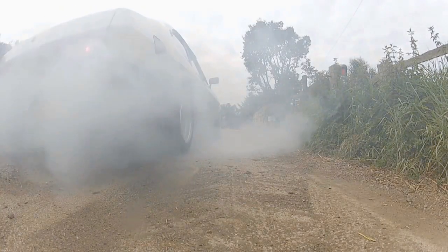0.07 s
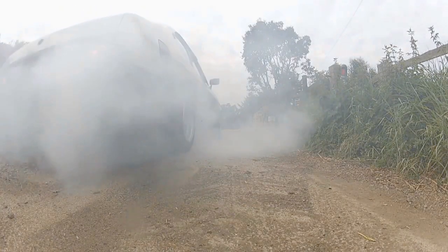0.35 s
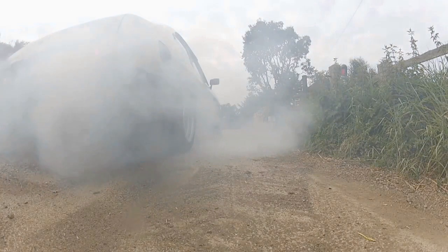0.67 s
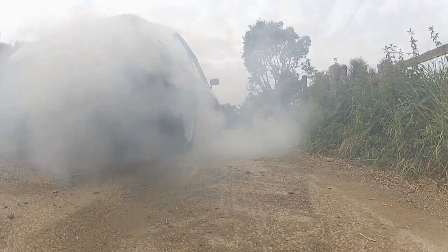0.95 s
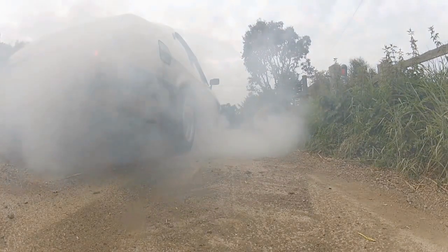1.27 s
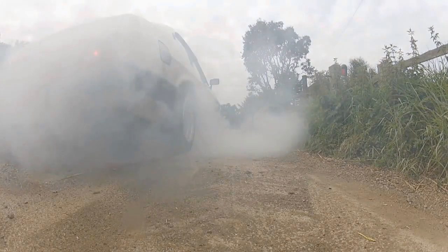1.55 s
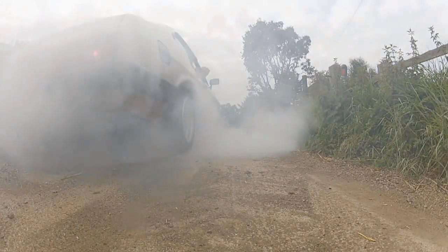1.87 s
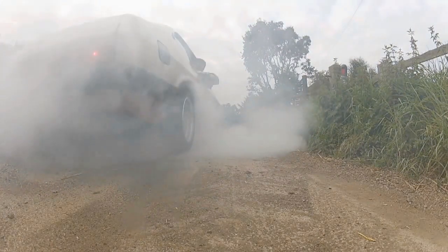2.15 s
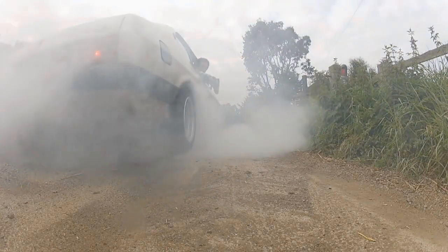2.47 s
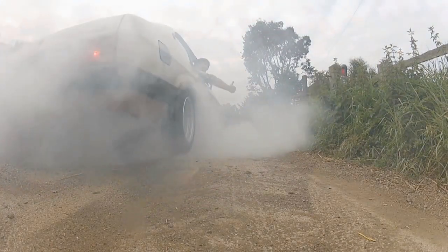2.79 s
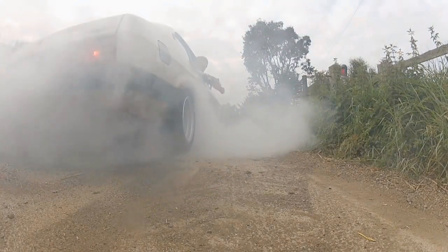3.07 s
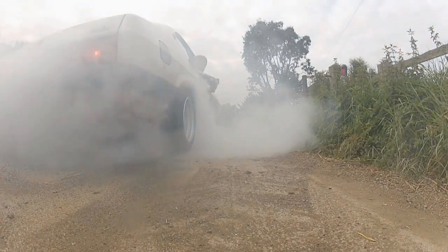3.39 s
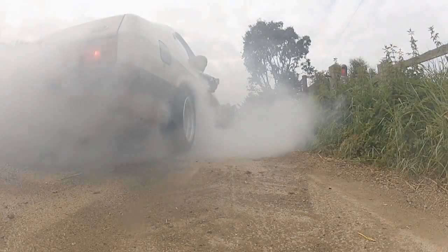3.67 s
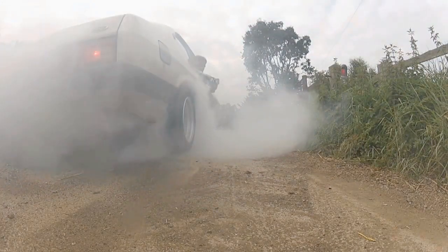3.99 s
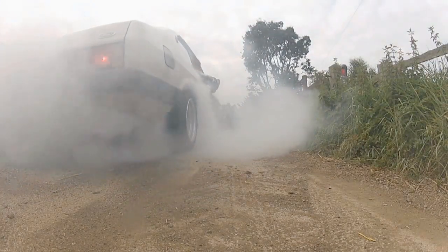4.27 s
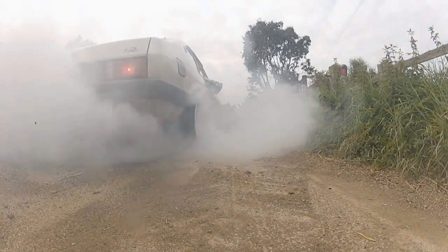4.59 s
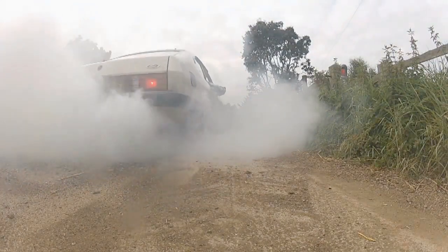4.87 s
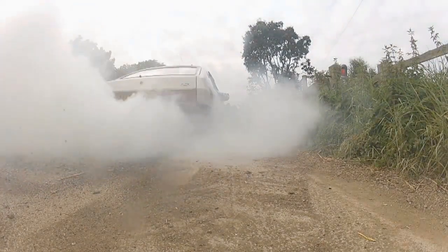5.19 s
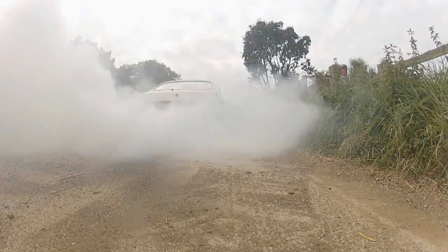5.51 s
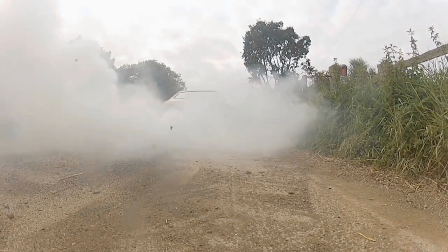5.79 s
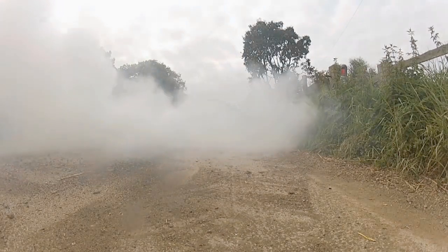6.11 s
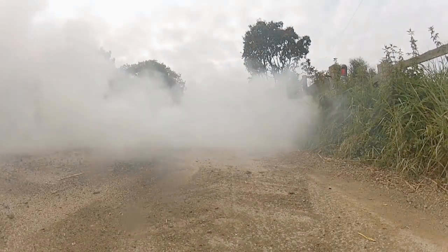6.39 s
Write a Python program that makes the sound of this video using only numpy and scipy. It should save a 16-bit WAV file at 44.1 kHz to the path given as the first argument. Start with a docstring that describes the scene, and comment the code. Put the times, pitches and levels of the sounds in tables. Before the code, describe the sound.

From just behind the tailpipe, a car engine drones and burbles at high revs while its tyres scrub on a dirt lane. Grit ticks now and then, and the exhaust briefly spits three times. A faint tyre chirp comes about halfway; later the car drives off, revs climbing amid quick, rough chirps. A faint wind rumble lies underneath, and the small microphone adds slight distortion.

```python
"""A four-cylinder car does a burnout on a dirt lane, heard from close behind its exhaust.
From the start, periodic firings drone over turbulent gas puffs, tyre scrub and low buffeting. Grit ticks,
and the engine stumbles and spits near 0.5, 1.8 and 4.5 s. Stick-slip chirps begin at 3.5 s and crowd
together after 5 s, as the car pulls away with rising revs. Throughout, a small camera overloads on the
pulses and adds a thin fizz by holding each of its samples."""
import sys
import numpy as np
from scipy import signal
from scipy.fft import rfft, irfft, next_fast_len
from scipy.io import wavfile
from scipy.ndimage import uniform_filter1d

SR = 44100
rng = np.random.default_rng(int(sys.argv[2]) if len(sys.argv) > 2 else 0)


def unload_audio(sound):
    """Save the sound as a 16-bit wav file, at the path given as the first command line argument."""
    columns = np.transpose(np.atleast_2d(sound))
    # keep every value between -1 and 1, then stretch to whole-number steps
    steps = np.round(np.clip(columns, -1, 1) * 32767)
    wavfile.write(sys.argv[1], SR, steps.astype(np.int16))


N = 284445
TIME = np.arange(N) / SR
HELD_HZ = 140  # nominal firing rate with the car held

# engine speed, hunting while the tyres spin, then climbing: t/s, firing rate f/Hz
REVS = [(0.0, 138.2), (0.23, 139.4), (0.43, 135), (0.63, 141), (0.87, 133.9), (1.03, 139.2), (1.22, 136.9),
        (1.39, 141), (1.65, 144.1), (1.84, 139.3), (2.13, 143.2), (2.33, 139.9), (2.89, 143.4),
        (3.16, 138.5), (3.33, 133.7), (3.49, 136.8), (3.69, 137.1), (3.92, 141.3), (4.02, 138.3),
        (4.26, 144.4), (4.4, 133.8), (4.67, 142), (4.79, 140), (4.96, 141), (5.28, 168), (5.53, 164.4),
        (5.8, 179), (6.05, 178.5), (6.3, 167.4), (6.45, 168)]
# the getaway: t/s, share of pulling away (0-1), reflection lead/firings, weak cylinder's place/firings
PULL_AWAY = [(4.85, 0.03, .13, 1.56), (5.25, 0.99, .37, 2.54)]
# a bang in the pipe, then a few weak firings: t/s, bang level/dB, dip/dB
STUMBLES = [(0.457, -37, 1), (1.759, -34, 2.5), (4.488, -32, 1)]


def gain_of(db):
    """Amplitude ratio of a level in decibels."""
    return 10 ** (np.asarray(db) / 20)


def unit_rms(x):
    """Normalisation to rms 1."""
    return x / np.sqrt(np.mean(x ** 2) + 1e-20)


def curves(table):
    """Linear interpolation of each column over time."""
    times, *columns = np.transpose(table)
    return [np.interp(TIME, times, column) for column in columns]


def coloured(x, points):
    """Spectral shaping by (f/Hz, level/dB) points, at rms 1."""
    hz, db = np.transpose(points)
    size = next_fast_len(N)
    f = np.fft.rfftfreq(size, 1 / SR)
    response = gain_of(np.interp(np.log(f + 1), np.log(hz), db))
    return unit_rms(irfft(rfft(x, size) * response, size)[:N])


def wander(rate_hz):
    """Random modulation: low-passed noise of rms 1."""
    smooth = signal.butter(2, rate_hz, fs=SR, output="sos")
    return unit_rms(signal.sosfilt(smooth, rng.standard_normal(N + SR))[SR:])


def add(mix, start_s, sound):
    """Superposition of a sound on the mix."""
    part = mix[max(round(start_s * SR), 0):][:len(sound)]
    part += sound[:len(part)]


def band_pass(x, hz, width_hz):
    """Band-pass filtering of gain 1, with a double pole for steep sides."""
    carrier = np.exp(2j * np.pi * hz * TIME)
    pole = np.exp(-np.pi * 1.5 * width_hz / SR)
    return 2 * (carrier * signal.lfilter([(1 - pole) ** 2], [1, -2 * pole, pole * pole], x / carrier)).real


def load_level(held_db, leaving_db, db_per_hz, db_per_s):
    """Load dependence: a rough layer swells as the tyres drag the engine down, until the car leaves."""
    firing_hz, = curves(REVS)
    pulling, *_ = curves(PULL_AWAY)
    loaded_db = held_db + db_per_hz * (HELD_HZ - firing_hz) + db_per_s * TIME
    return (1 - pulling) * loaded_db + pulling * leaving_db


def note_levels(firing_hz, pulling, leaving_db, sag_s=0.035, flutter_db=0.29):
    """Pipe resonance: speed tunes each harmonic on or off a peak; the higher ones flutter more."""
    # the note with the car held: harmonic, level/dB at HELD_HZ, then its slopes against
    # extra speed/(dB/Hz), deceleration/(dB/(Hz/s)) and time/(dB/s)
    held_note = [(1, -33, 0.5, 0.0374, 0.24), (2, -34, 0.47, -0.0518, -0.33), (3, -42, -0.74, 0.0077, 0.1),
                 (4, -49.5, 0.77, 0, 0.18)]
    acceleration = uniform_filter1d(np.gradient(firing_hz) * SR, round(sag_s * SR))
    sag = np.maximum(-acceleration, 0)
    levels = []
    for (harmonic, db, by_speed, by_sag, by_time), away_db in zip(held_note, leaving_db):
        held_db = db + by_speed * (firing_hz - HELD_HZ) + by_sag * sag + by_time * TIME
        levels.append((1 - pulling) * held_db + pulling * away_db + flutter_db * harmonic * wander(6.8))
    return levels


def firing_note(turns, lead, levels_db, boom_db=0.5, reflection_db=1.34):
    """Reflection at an open pipe end adds a sharp, inverted pulse to each firing's round boom."""
    boom = gain_of(levels_db[0] + boom_db) * np.cos(2 * np.pi * turns)
    reflection = sum(gain_of(db) * np.cos(2 * np.pi * harmonic * (turns + lead))
                     for harmonic, db in enumerate(levels_db[1:], 2))
    return np.sqrt(2) * (boom - gain_of(reflection_db) * reflection)


def burble(turns, lead, weak_at, orders, waver):
    """Subharmonics: one weak cylinder in four gives lines at multiples of a quarter of the firing rate."""
    out = np.zeros(N)
    for order, db in orders:
        multiple = order / 4
        place = turns - weak_at if multiple % 1 else turns + lead  # whole multiples sharpen the reflection
        phase = 2 * np.pi * multiple * place + waver * order * wander(2.6)
        out -= gain_of(db) * (1 + waver * order * wander(2.47)) * np.cos(phase)
    return np.sqrt(2) * out


def firing_strength(scatter_db=0.51, recover_s=0.032):
    """Cyclic variation: combustion scatters from stroke to stroke and sags after each stumble."""
    db = scatter_db * wander(61)
    for start_s, _, dip_db in STUMBLES:
        db -= dip_db * np.exp(-((TIME - start_s - recover_s) / recover_s) ** 2)
    return gain_of(db)


def rasp(turns, pulling, depth=0.28, lope=0.11, lag_turns=0.087):
    """Turbulent jet noise, modulated into a puff per firing; it hollows out as the car goes."""
    # gas noise density at the pipe mouth: f/Hz, level/dB held, level/dB pulling away (both relative)
    gas_spectrum = [(60, -5.5, -18), (151, -20, -16), (293, -8.5, 0), (490, -2.5, 3), (652, 4.5, 1.5),
                    (860, -4.5, -12), (1120, -4.5, -10), (1530, -16, -13), (2240, -19, -22),
                    (3600, -30, -29), (6000, -39.5, -43)]
    puff = np.exp(depth * np.cos(2 * np.pi * (turns - lag_turns)) + lope * np.cos(np.pi * turns))
    gas = puff * rng.standard_normal(N)
    near = coloured(gas, [(hz, db) for hz, db, _ in gas_spectrum])
    far = coloured(gas, [(hz, db) for hz, _, db in gas_spectrum])
    return (1 - pulling) * near + pulling * far


def exhaust(jitter_turns=0.0052, rasp_gain_db=4.5, distance_db=-2.5, gust_db=0.52):
    """Phase locking: one crankshaft times note, burble and rasp."""
    # lines from unequal cylinders, held and pulling away: multiple of the cycle rate, relative level/dB
    held_orders = [(1, -29), (2, -19.5), (3, -18.5), (5, -11), (6, -8.5), (7, -2), (9, -11.5), (10, -16.5),
                   (11, -14.5), (13, -13), (14, -6), (15, -19), (17, -15), (18, -15), (19, -13.5),
                   (20, -11), (22, -21.5), (23, -19.5), (24, -20.5), (26, -27.5), (28, -24.5), (32, -24)]
    pulling_orders = [(1, -25), (2, -29), (3, -17), (5, -8), (6, -1.5), (7, -6), (9, -11.5), (10, -15),
                      (11, -4.5), (13, -13), (14, -14), (15, -8.5), (17, -24), (18, -18), (19, -20),
                      (20, -23), (24, -27.5), (28, -32)]
    # the exhaust as the car leaves: t/s, then base level/dB of harmonics 1-4, burble and rasp
    drive_off = [(5.07, -30, -39.5, -39, -71, -36.5, -42.5), (5.26, -35, -33.5, -42.5, -46.5, -45.5, -51.5),
                 (5.48, -30.5, -39.5, -34, -59.5, -49.5, -52), (5.7, -33, -50, -36.5, -55, -41.5, -48),
                 (5.81, -29, -47, -38.5, -64, -42.5, -51), (5.99, -28.5, -36, -47.5, -49.5, -43, -46),
                 (6.18, -31.5, -38.5, -41.5, -55, -43, -50), (6.32, -30, -51, -43, -50, -40, -44),
                 (6.44, -33, -40, -35, -46, -38.5, -48)]
    firing_hz, = curves(REVS)
    *leaving_db, leaving_burble_db, leaving_rasp_db = curves(drive_off)
    pulling, lead, weak_at = curves(PULL_AWAY)
    turns = np.cumsum(firing_hz) / SR + jitter_turns * wander(55.0)  # one turn of phase per firing
    note = firing_note(turns, lead, note_levels(firing_hz, pulling, leaving_db))
    held = burble(turns, lead, weak_at, held_orders, waver=0.026)
    leaving = burble(turns, lead, weak_at, pulling_orders, waver=0.019)
    burble_db = load_level(-40, leaving_burble_db, db_per_hz=0.33, db_per_s=-0.15)
    uneven = gain_of(burble_db) * ((1 - pulling) * held + pulling * leaving)
    gas_db = load_level(-47, leaving_rasp_db + distance_db, db_per_hz=0.1, db_per_s=-0.26)
    gas_db += rasp_gain_db + gust_db * wander(8) + gas_surges()
    return firing_strength() * (note + uneven) + gain_of(gas_db) * rasp(turns, pulling)


def tyre_scrub(grit_per_s=700, grit_spread_db=3, grit_share=0.24,
               flutter_db=0.23, waver_db=2, gain_db=1, surge_db=0.85):
    """Friction noise of spinning rubber on grit: bands of hiss, each wavering at random in level."""
    # bands of tyre hiss: f/Hz, width/Hz, relative level/dB
    hiss_bands = [(1110, 170, -2.5), (1370, 300, -2), (2070, 716, -1), (2705, 720, -4), (3780, 990, -13.5),
                  (4550, 770, -16), (5410, 370, -24)]
    level_db = load_level(-59, -61.5, db_per_hz=0.15, db_per_s=0.05) + surge_db * wander(5.6)
    grain_size = gain_of(grit_spread_db * np.minimum(rng.exponential(1, N), 4))
    grit = unit_rms(grain_size * rng.standard_normal(N) * (rng.random(N) < grit_per_s / SR))
    friction = rng.standard_normal(N) + grit_share * grit
    scrub = sum(gain_of(db + waver_db * wander(14)) * unit_rms(band_pass(friction, hz, width))
                for hz, width, db in hiss_bands)
    return gain_of(level_db + gain_db + flutter_db * wander(31)) * scrub


def buffeting(level_db=-65):
    """Pressure fluctuations in the air behind the car make a low rumble."""
    # noise density of the air: f/Hz, relative level/dB
    air_spectrum = [(10, 0), (30, 9), (80, -1), (130, 3), (300, -25), (1000, -60)]
    return gain_of(level_db) * coloured(rng.standard_normal(N), air_spectrum)


def ticks_and_spits():
    """Exponentially decaying noise bursts: ticks of grit, and exhaust spits at the stumbles."""
    # short noise bursts: t/s, level/dB, decay time/s
    bursts = [(0.272, -41.5, 0.0037), (0.457, -41, 0.005), (1.755, -46, 0.0039), (2.40, -41, 0.0029),
              (4.185, -41, .003), (4.473, -43.5, 0.019), (4.802, -36.5, 0.0055), (4.935, -50, 0.0054),
              (5.041, -53, .001), (5.63, -51, .001)]
    t, envelope = np.arange(SR // 10) / SR, np.zeros(N)
    for start_s, db, decay_s in bursts:
        add(envelope, start_s, gain_of(db) * np.exp(-t / decay_s))
    return envelope * coloured(rng.standard_normal(N), [(300, 4), (1200, 4), (3000, -9), (6000, -14.5)])


def gas_surges(spit_db=3, spit_s=0.018):
    """Transient flow: the rise in gas noise, in dB, as the pipe spits at each stumble."""
    return sum(spit_db * np.exp(-((TIME - start_s + spit_s / 2) / spit_s) ** 2)
               for start_s, _, _ in STUMBLES)


def bangs(ring_hz=190, decay_s=0.01):
    """Damped oscillation: unburnt fuel thumps in the pipe."""
    t, out = np.arange(SR // 20) / SR, np.zeros(N)
    for start_s, db, _ in STUMBLES:
        add(out, start_s, gain_of(db) * np.exp(-t / decay_s) * np.sin(2 * np.pi * ring_hz * t))
    return out


def squeal(quaver=0.0173, rough=0.5, octave_rough=0.48, gain_db=1):
    """Stick-slip oscillation of the tread gives rough, quavering chirps with an octave above."""
    # the tyres find grip: t/s, duration/s, f/Hz, base level/dB, octave's relative level/dB
    chirps = [(3.549, 0.32, 1360, -60, -5), (3.65, 0.13, 1570, -58, -14), (5.20, .12, 1092, -48.5, -12),
              (5.305, 0.058, 1545, -55, -8), (5.35, .15, 1117, -46.5, -18), (5.40, 0.11, 1487, -52.5, -12),
              (5.494, 0.045, 1510, -52, -5), (5.607, 0.098, 1470, -48, -6), (5.677, 0.13, 1140, -54.5, -12),
              (5.741, 0.076, 1552, -51, -7), (5.788, 0.12, 1493, -48.5, -9),
              (5.904, 0.054, 1482, -50.5, -4), (6.11, 0.059, 1457, -55, -8.5)]
    out = np.zeros(N)
    warped_time = np.cumsum(1 + quaver * wander(109)) / SR
    flutter, octave_flutter = 1 + rough * wander(130), 1 + octave_rough * wander(90)
    for start_s, length_s, hz, db, octave_db in chirps:
        span = slice(round(start_s * SR), round((start_s + length_s) * SR))
        phase = 2 * np.pi * hz * warped_time[span]
        octave = gain_of(octave_db) * octave_flutter[span] * np.sin(2 * phase)
        chirp = flutter[span] * np.sin(phase) + octave
        add(out, start_s, gain_of(db + gain_db) * signal.windows.tukey(len(phase), 0.6) * chirp)
    return out


def scene():
    """Superposition of all sources at one point low behind the car."""
    return (buffeting() + exhaust() + tyre_scrub() + ticks_and_spits() + bangs() + squeal())[None]


def record(dry, ceiling_db=-24, knee=14, camera_hz=12000, edge_hz=15500):
    """Saturation flattens the peaks; a zero-order hold mirrors the spectrum about the camera's rate."""
    clipped = dry / (1 + abs(dry / gain_of(ceiling_db)) ** knee) ** (1 / knee)
    coarse = signal.resample_poly(clipped, camera_hz, SR, axis=1)
    held = signal.resample_poly(np.repeat(coarse, 4, axis=1), SR, 4 * camera_hz, axis=1)[:, :N]
    low_pass = signal.firwin(801, edge_hz, window=("kaiser", 9), fs=SR)
    return signal.oaconvolve(held, low_pass[None], "same")


dry = scene()
out = record(dry)
unload_audio(out)
```